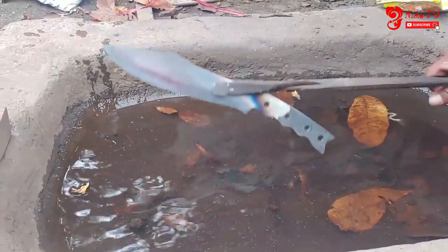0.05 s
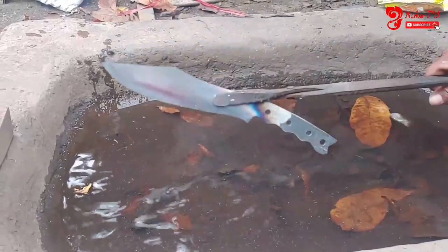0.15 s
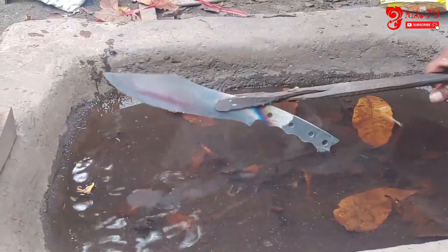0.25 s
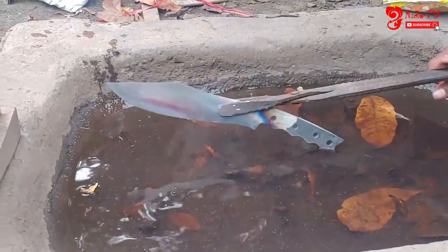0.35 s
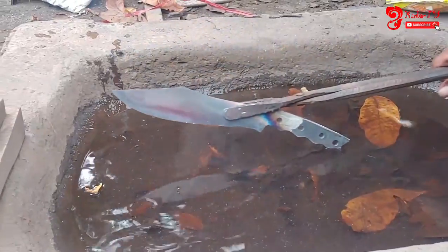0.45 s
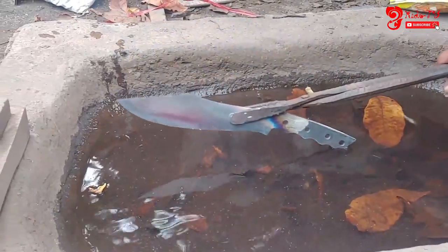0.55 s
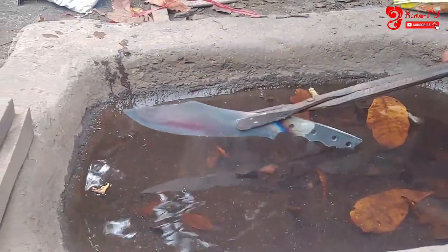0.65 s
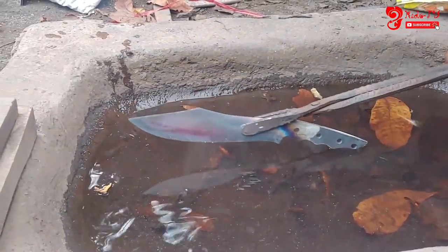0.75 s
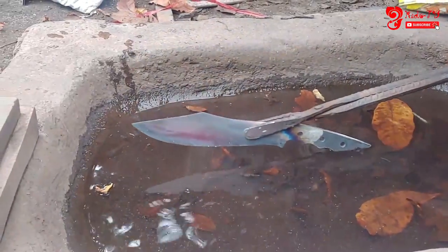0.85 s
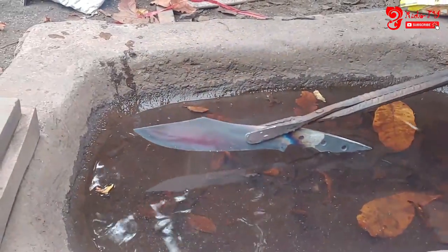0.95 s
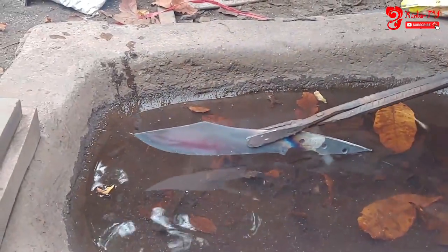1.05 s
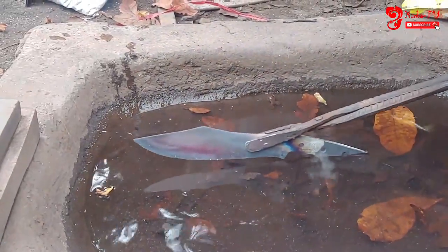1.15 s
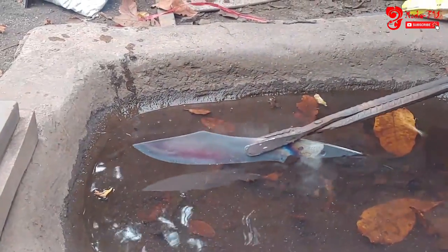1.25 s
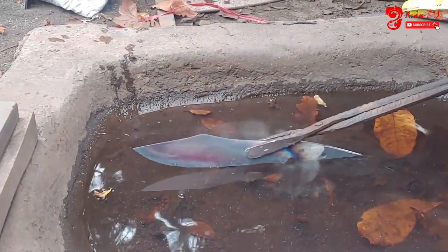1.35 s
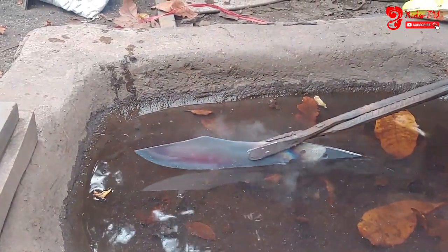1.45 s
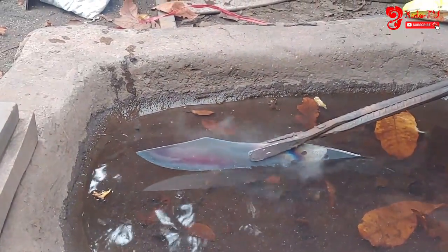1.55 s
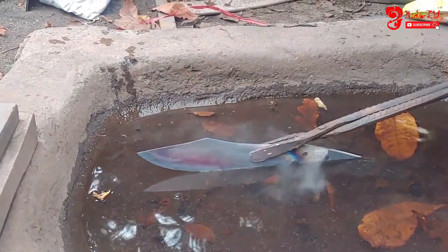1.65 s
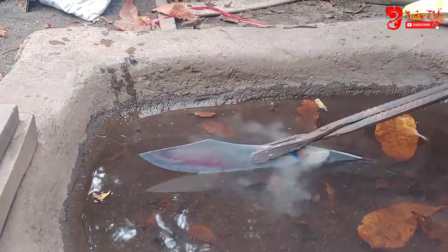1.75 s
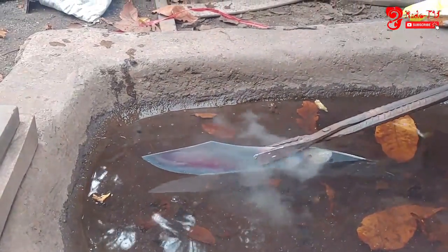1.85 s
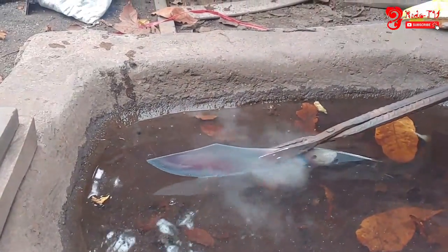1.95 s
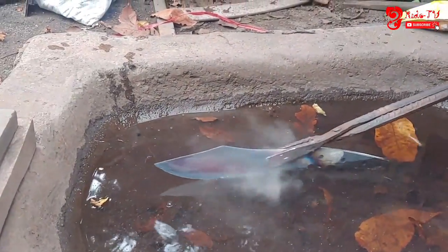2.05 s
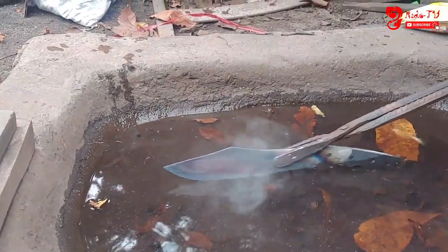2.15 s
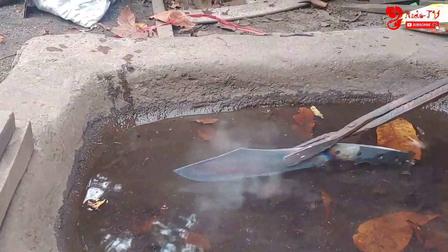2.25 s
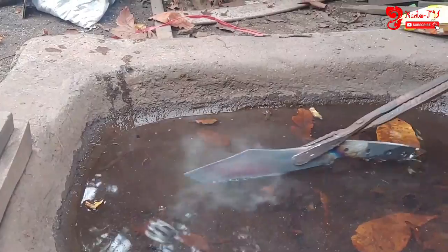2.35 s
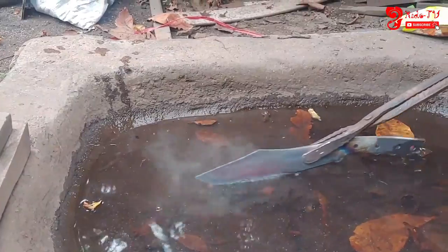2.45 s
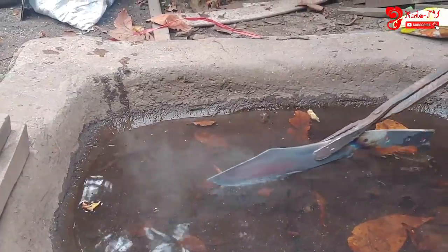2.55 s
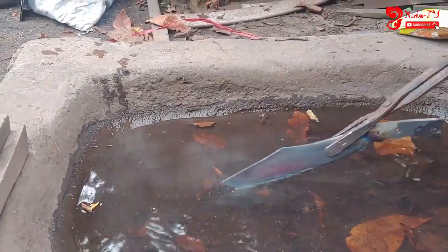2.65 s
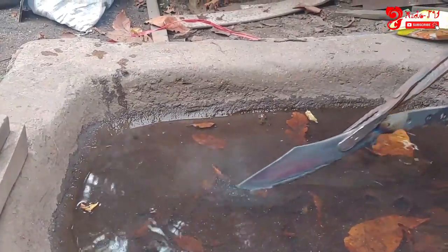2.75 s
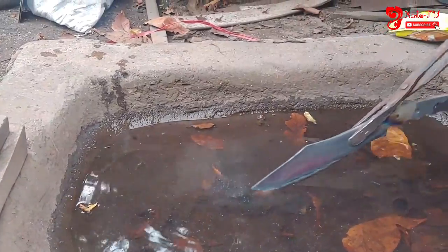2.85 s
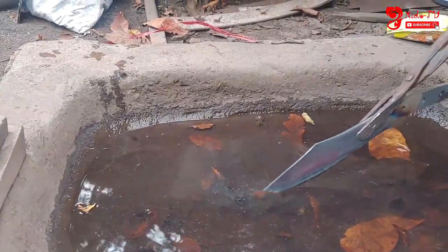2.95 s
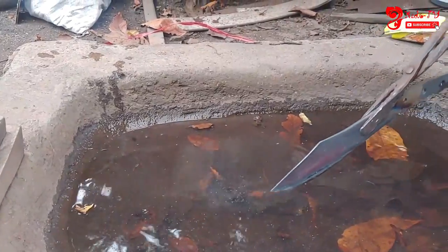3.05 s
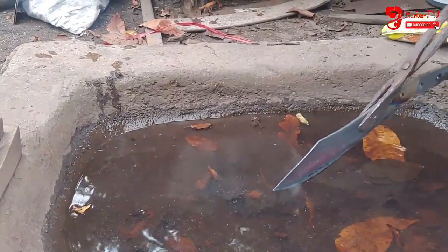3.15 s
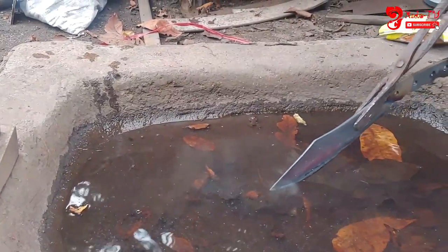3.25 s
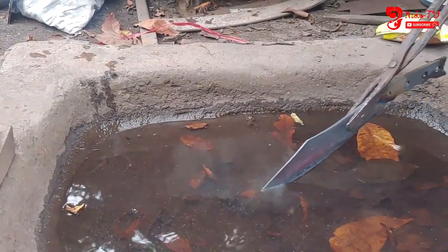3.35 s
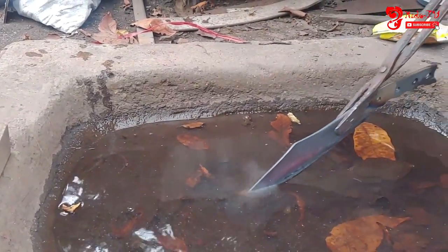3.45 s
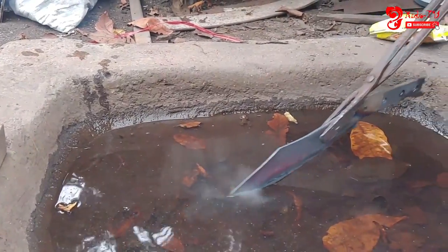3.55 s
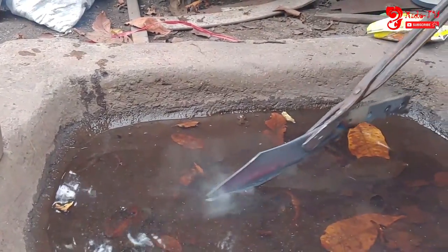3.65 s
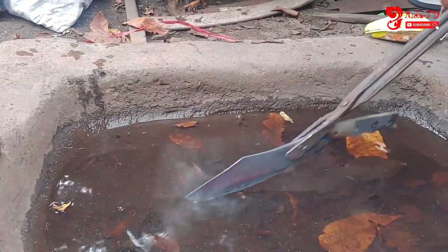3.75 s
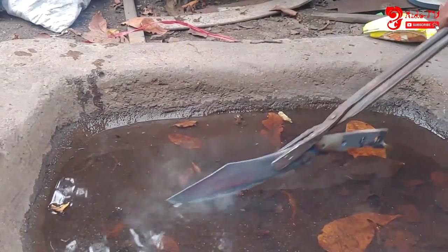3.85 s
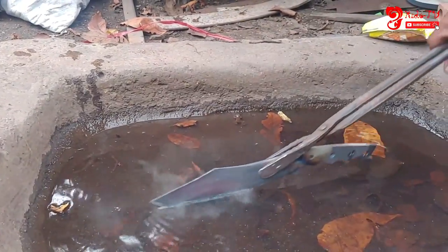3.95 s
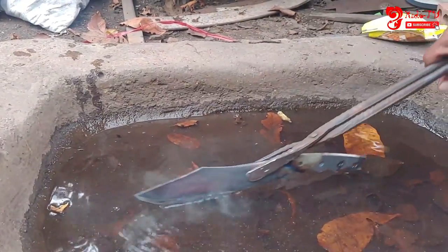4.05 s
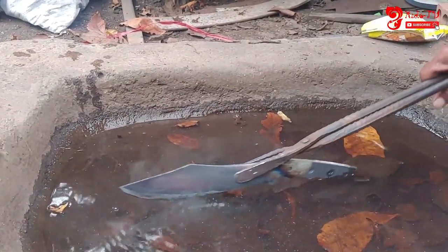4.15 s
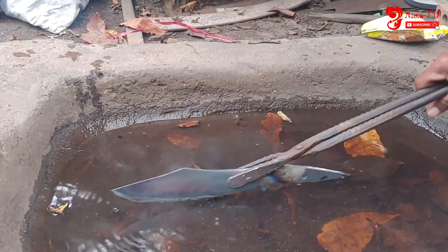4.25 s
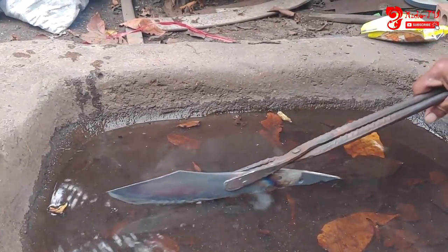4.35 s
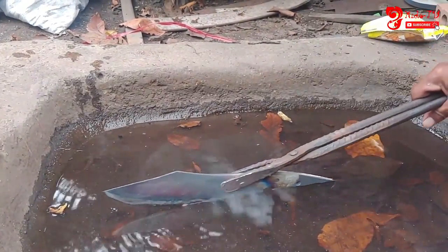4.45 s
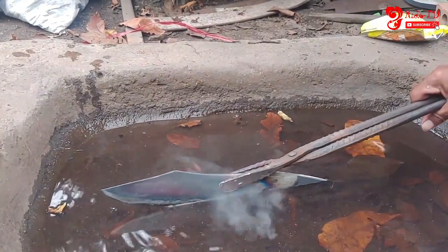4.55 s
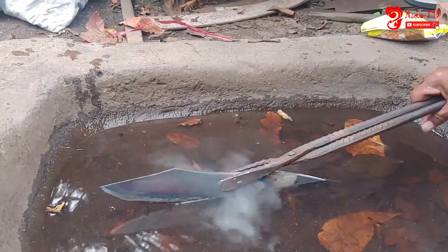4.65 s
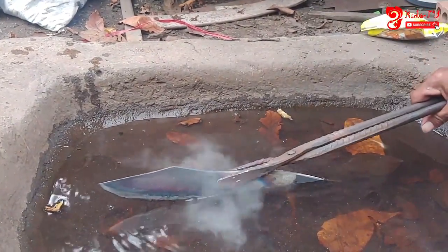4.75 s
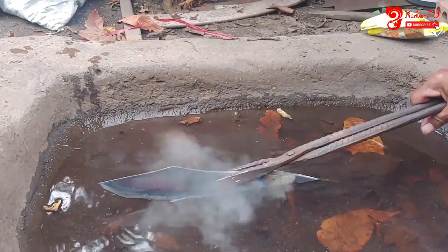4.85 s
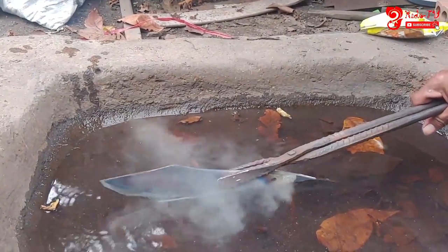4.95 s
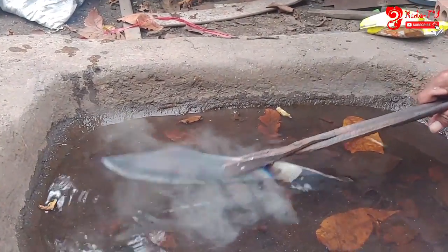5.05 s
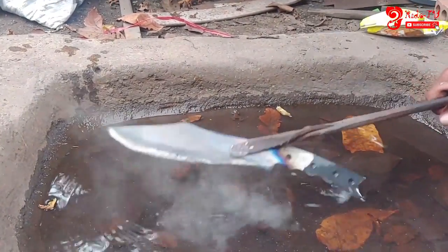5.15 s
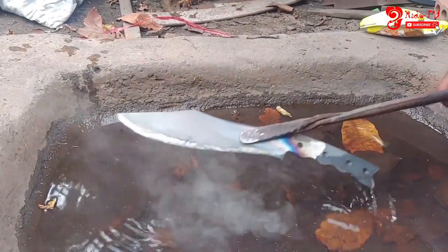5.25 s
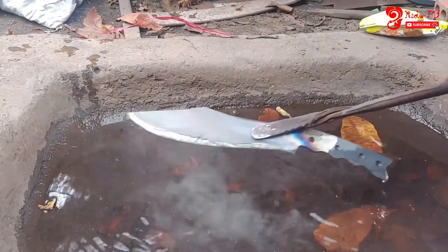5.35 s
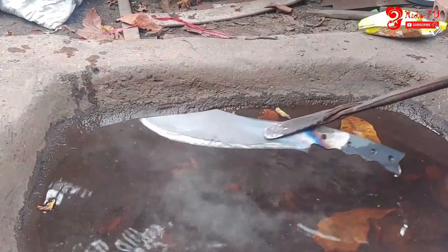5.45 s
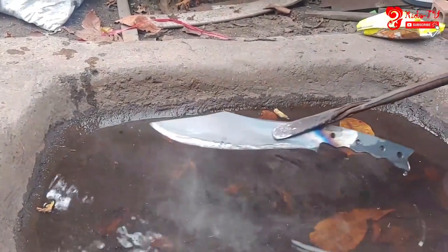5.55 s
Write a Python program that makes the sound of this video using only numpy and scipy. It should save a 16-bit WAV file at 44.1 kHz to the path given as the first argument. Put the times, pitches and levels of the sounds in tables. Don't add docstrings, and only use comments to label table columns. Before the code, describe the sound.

For the first 0.8 s there is only a faint outdoor wash, a distant motorbike idling in soft uneven thuds, and tiny drips. A faint rising bird whistle and thin metallic tones come just before a hot blade touches water in a trough. From about 0.8 s hiss rises fast, reaching a strong, bright, crackling sizzle by 1.5 s, with a sharp spit near 1.7 s. It stays close, wide and gusty, with spits and ticks around 2.4 s, thinner and a little softer near 3 s, then fuller again. Short dropouts come near 3.85 and 4.3 s as the blade lifts. Low thuds grow behind; from 4.2 s the motorbike pulls away, its barking exhaust rising in pitch. After a last deep gurgling burst at 5.1 s, the hiss falls away steeply, leaving the receding engine and a clearer upward bird whistle around 5.3 s until the end at 5.6 s.

```python
import sys
import numpy as np
from scipy import signal
from scipy.fft import rfft, irfft, next_fast_len
from scipy.io import wavfile
from scipy.ndimage import uniform_filter1d

SR = 44100
rng = np.random.default_rng(int(sys.argv[2]) if len(sys.argv) > 2 else 0)


def how_loud(loudness_db):
    steps = np.asarray(loudness_db, float) / 20
    return 10 ** steps


def put_to_file(sound):
    columns = np.atleast_2d(sound).T
    safe = np.clip(columns, -1, 1)
    whole_steps = np.round(safe * 32767)
    wavfile.write(sys.argv[1], SR, whole_steps.astype(np.int16))


N = 247401
T = np.arange(N) / SR
TAIL = 9000


def evened(x):
    return x / np.sqrt(np.mean(x ** 2) + 1e-20)


def read(points, hz):
    f, value = np.transpose(points)
    return np.interp(np.log(hz + 1), np.log(f + 1), value)


def columns(rows, t):
    s, *rest = np.transpose(rows)
    return [np.interp(t, s, c) for c in rest]


def bumps(modes, hz):
    return sum(db / (1 + (2 * (hz - f) / width) ** 2) for f, width, db in modes)


def resonate(x, hz, width):
    turn = np.exp(2j * np.pi * hz * T)
    r = np.exp(-np.pi * width / SR)
    return 2 * (turn * signal.lfilter([1 - r], [1, -r], x / turn)).real


def ring(modes):
    t = T[:TAIL]
    out = sum(how_loud(db - 60 * t / t60) * np.sin(2 * np.pi * hz * t) for hz, db, t60 in modes)
    return out / abs(out).max()


def drift(shape, widths):
    x = rng.standard_normal(shape)
    for axis, width in enumerate(widths):
        for _ in range(2):
            x = uniform_filter1d(x, int(width), axis)
    return evened(x)


def echoes(x, t60, gap_s, same):
    t = T[:TAIL]
    tail = same * rng.standard_normal(TAIL) + np.sqrt(1 - same ** 2) * rng.standard_normal((2, TAIL))
    tail *= how_loud(-60 * t / t60) * (t > gap_s)
    return signal.oaconvolve(x[None], tail / np.linalg.norm(tail[0]), axes=1)[:, :N]


def to_ports(left, other, hz, lead, likeness):
    same = np.clip(read(likeness, hz)[:, None] + .16 * drift(left.shape, [2, 110]), 0, .98)
    right = same * left * np.exp(-1j * lead) + np.sqrt(1 - same ** 2) * other
    return signal.istft(np.array([left, right]), nperseg=512, noverlap=384)[1][:, :N]


# [t/s, level/dB, deep gurgle/dB]
BOIL = [(0, -68.5, 17), (.3, -68, 16), (.61, -81.5, 27), (.785, -74, 23), (.815, -48, 11),
        (.96, -38.5, -10), (1.14, -26.5, -5), (1.41, -23.5, 1.5), (1.56, -16.5, -0.5), (2.01, -15.5, 0),
        (2.42, -19.5, 6.5), (2.7, -19.5, 4.5), (2.96, -23.5, -3), (3.2, -20, -4), (3.49, -20.5, -1.5),
        (3.76, -18, -4), (4.05, -17, 2.5), (5.05, -16, 0)]
# [start t/s, out/s, return/s, level change/dB, gurgle change/dB]
LIFTS = [
    (0.839, 0.0067, 0.016, -10, 0),
    (2.14, 0.0083, 0.11, -0.5, -3),
    (2.74, .01, 0.092, -2.5, -2),
    (2.989, 0.047, 0.039, -3.5, -4),
    (3.759, 0.0039, 0.037, -15.5, 5),
    (4.138, 0.13, 0.062, -14.5, 0),
    (4.23, 0.044, 0.2, -6, -9),
    (4.7, .05, 0.053, -4, 2),
    (5.07, .6, .1, -32, 8),
]
# [t/s, half length/s, level/dB, gurgle change/dB]
SPLASHES = [
    (2.393, 0.0097, 4, 3),
    (2.668, 0.026, 2, -2),
    (3.326, 0.025, 0.5, 5.5),
    (5.111, 0.036, 3.5, 8),
]


def boiling(t):
    boil_db, gurgle_db = columns(BOIL, t)
    drop_db = thin_db = 0
    lift_s = 0.099
    for s, out_s, back_s, db, change_db in LIFTS:
        back = s + lift_s + out_s
        out = np.interp(t, [s, s + lift_s, back, back + back_s], [0, 1, 1, 0])
        drop_db = drop_db + db * out
        gurgle_db = gurgle_db + change_db * out
        thin_db = thin_db - 0.4 * change_db * out
    for s, half_s, db, change_db in SPLASHES:
        burst = np.exp(-((t - s) / half_s) ** 2)
        boil_db = boil_db + db * burst
        gurgle_db = gurgle_db + change_db * burst
    top_db = 1.5 + thin_db - 0.095 * drop_db
    return boil_db + drop_db, gurgle_db, 0.38 * gurgle_db, top_db


# [f/Hz, level/dB per Hz]
STEAM = [(300, -32.5), (750, -27.5), (1050, -21.5), (1400, -18.5), (2000, -9.5), (3400, -10.5),
         (5000, -4.5), (7000, -2.5), (9000, -7.5), (12000, -9), (15500, -19)]
# [f/Hz, width/Hz, level/dB]
TROUGH = [(1056, 82, 13.5), (1240, 380, -0.5), (1866, 140, 3.5), (2140, 64, 2), (2230, 160, -0.5),
          (3070, 300, 2), (3560, 340, 3.5), (7680, 360, 2.5)]
# [f/Hz, likeness/1]
SAME = [(300, .8), (700, .3), (1050, .82), (1500, .3), (1800, .7), (2030, .85), (2180, .45), (2400, .7),
        (3000, .4), (3280, .78), (3500, .45), (3900, .72), (4400, .4), (15000, .45)]
# [f/Hz, phase/rad]
LEAD = [(1100, .2), (1450, 2.4), (1600, .5), (1850, 1.3), (2000, 3.0), (2090, 3.5), (2250, 6.2),
        (2600, 7.2), (2880, 9.2), (3350, 9.6), (3750, 12.4), (5000, 14.2), (6720, 28.6), (15700, 52.3)]


def steam():
    pockets_per_s = 1500
    sizes = how_loud(2.24 * np.minimum(rng.exponential(1, (2, N)), 5))
    crackle = sizes * rng.standard_normal((2, N)) * (rng.random((2, N)) < pockets_per_s / SR)
    fizz = rng.standard_normal((2, N)) + 0.29 * evened(crackle)
    fizz *= how_loud(0.36 * drift(N, [120]) + 0.41 * drift(N, [900]))
    hz, t, z = signal.stft(fizz, SR, nperseg=512, noverlap=384)
    boil_db, low_db, mid_db, top_db = boiling(t)
    octave = np.log2(hz + 1)[:, None]
    low = np.clip((np.log2(3000) - octave) / 0.69, 0, 1)
    mid = np.clip((np.log2(5400) - octave) / 0.24, 0, 1) - low
    top = np.clip((octave - np.log2(8800)) / 0.19, 0, 1)
    colour_db = read(STEAM, hz) + bumps(TROUGH, hz)
    field_db = colour_db[:, None] + top * top_db + boil_db + low * low_db + mid * mid_db
    field_db = field_db + 0.99 * drift(field_db.shape, [4, 12]) + 1.0 * drift(field_db.shape, [2, 90])
    sway = (hz[:, None] / 9000) ** 2 * 2.17 * drift(len(t), [150])
    z = z * how_loud(field_db + 5.5)
    return to_ports(z[0], z[1], hz, read(LEAD, hz)[:, None] + sway, SAME)


# [t/s, peak level/dB, f/Hz, t60/s, left-right/dB]
SPITS = [
    (.092, -61, 5970, 0.17, -15),
    (.188, -59, 1910, 0.097, -19),
    (.288, -58, 6400, .04, -12),
    (0.357, -53, 1270, 0.053, -11),
    (1.722, -8, 4130, 0.045, 2),
    (2.39, -15, 2550, 0.029, -6),
    (2.396, -25, 1108, 0.11, -9),
    (2.423, -22, 7350, .015, 3),
    (2.463, -12, 7260, .012, 4),
]


def spits():
    out = np.zeros((2, N + TAIL))
    for s, db, hz, t60, pan_db in SPITS:
        drop = ring([(hz, 0, t60), (hz * 2.2, -7, t60 * 0.44)])
        drop *= np.minimum(T[:TAIL] / 0.0038, 1)
        start = round(s * SR)
        out[:, start:start + TAIL] += how_loud(db + np.array([[.5], [-.5]]) * pan_db) * drop
    return out[:, :N]


# [f/Hz, level/dB, t60/s]
BARK = [(272, -6, 0.11), (311.2, 3, 0.075), (337.6, -11, 0.087), (450, -5, 0.0065)]
# [t/s, firing rate/Hz]
SPEED = [(4.22, 15.3), (4.33, 16.4), (4.45, 18.6), (4.55, 19.6), (4.7, 21.0), (4.9, 22.0), (5.15, 22.7),
         (5.35, 23.3), (5.61, 24.7)]
# [t/s, level/dB, boom share/dB]
REV = [
    (4.22, -42.5, 3),
    (4.37, -36.5, 4.5),
    (4.6, -33, -3.5),
    (4.74, -37.5, 2),
    (4.82, -33.5, -4.5),
    (5.43, -36.5, 0.5),
    (5.61, -39, -2),
]
# [multiple of firing rate/1, level/dB]
LOW_ORDERS = [(2, -34), (3, -28), (4, -5.5), (5, 0.5), (6, 0), (7, -7)]


def pulling_away():
    bark_db, share_db = columns(REV, T)
    running = np.clip((T - SPEED[0][0]) / .01, 0, 1)
    turns = np.cumsum(columns(SPEED, T)[0] * (running > 0)) / SR + .85
    fires = np.diff(np.floor(turns), prepend=0) * how_loud(1.2 * drift(N, [400]))
    orders = 0
    for k, db in LOW_ORDERS:
        orders = orders + how_loud(db + 4.8 * drift(N, [1500])) * np.cos(2 * np.pi * k * (turns - .14))
    bark = ring(BARK) * (1 - np.exp(-(T[:TAIL] / 0.003) ** 2))
    barks = signal.oaconvolve(fires * how_loud(bark_db + 14.0), bark)[:N]
    return running * how_loud(bark_db + share_db - 4.5) * orders + barks


# [t/s, thud level/dB, thud f/Hz]
IDLE = [(.06, -50, 103), (.3, -55, 101), (.55, -62, 85), (.8, -53, 86), (1.2, -47, 99), (1.6, -50.5, 74.5),
        (2.0, -48, 84), (3.0, -48.5, 81.3), (4.17, -44, 90)]
# [t/s, firings so far/1]
IDLE_TURNS = [(.059, 0), (.674, 7), (.977, 10), (1.755, 17), (1.889, 18), (2.25, 22), (2.677, 26),
              (2.929, 28), (3.09, 30), (3.508, 34), (3.971, 38), (4.168, 40)]
# [t/s, peak level/dB, f/Hz]
HEAVY = [
    (.977, -41, 65.6),
    (1.349, -45, 94),
    (1.412, -43.5, 89),
    (1.755, -47, 65),
    (2.157, -46, 81),
    (2.678, -42, 76.6),
    (3.089, -35.5, 81),
    (3.508, -35.5, 92),
    (3.548, -36, 66),
    (3.97, -38.5, 104),
]


def idle_thuds():
    uneven_db, uneven_pitch = 4, 0.1
    anchors, counts = np.transpose(IDLE_TURNS)
    s = np.interp(np.arange(counts[-1] + 1), counts, anchors)
    db, hz = columns(IDLE, s)
    chance = rng.standard_normal((len(s), 3))
    thud_db = db + uneven_db * chance[:, 0]
    thud_hz = hz * (1 + uneven_pitch * chance[:, 1])
    knock_db = -25 + .3 * columns(DRONE, s)[0] + uneven_db * chance[:, 2]
    return list(np.c_[s, thud_db, thud_hz, knock_db]) + [(s, db, hz, -30) for s, db, hz in HEAVY]


def idling():
    out, t = np.zeros(N + TAIL), T[:TAIL]
    for s, db, hz, sharp_db in idle_thuds():
        swell = t / 0.015 * np.exp(1 - t / 0.015)
        thud = np.sin(2 * np.pi * hz * t) + 0.39 * np.sin(2 * np.pi * 1.51 * hz * t + 1)
        knock = how_loud(sharp_db + 20) * ring(BARK) * np.minimum(t / 0.0037, 1)
        start = round(s * SR)
        out[start:start + TAIL] += how_loud(db - 1) * (swell * thud + knock)
    return out[:N]


# [t/s, nearness/dB, strain/dB]
DRONE = [(0, -1, -4), (.67, -9, -4), (.95, 4.5, 3), (1.55, 13, 9), (2.5, -1, -5), (2.72, 21, 3),
         (2.95, 12, 4), (3.06, 26.5, 2), (3.5, 21.5, 5), (3.67, 31, 7), (3.83, 19, 6), (3.95, 25.5, 10),
         (4.4, 31.5, 15), (4.8, 30.5, 19), (5.22, 32, 23), (5.61, 32.5, 23.5)]
# [f/Hz, width/Hz, far level/dB, slope/dB per dB of nearness, wander/dB]
DRONE_PARTS = [(64, 32, -65, .5, 2), (189, 9, -79, .35, 1.0), (462, 70, -74, 1.0, 1.5),
               (300, 130, -77, .55, 3)]
# [t/s, half length/s, level/dB]
HUMS = [
    (2.416, 0.18, 16.5),
    (2.703, 0.028, 10),
    (3.802, .16, 12),
    (4.096, 0.15, 16),
    (5.298, 0.45, 16.5),
]


def engine_drone():
    near_db, strain_db = columns(DRONE, T)
    buzz_db = sum(db * np.exp(-((T - s) / half_s) ** 2) for s, half_s, db in HUMS)
    drone = 0
    for (hz, width, far_db, slope, wander_db), buzz in zip(DRONE_PARTS, (0, 1, 0, 0)):
        db = far_db + slope * near_db + buzz * buzz_db + wander_db * drift(N, [3000])
        noise = rng.standard_normal(N) + 0.96 * rng.standard_normal((2, N))
        hum = evened(resonate(resonate(noise, hz, width), hz, 2 * width))
        hum = hum + buzz * 3.7 * np.sin(2 * np.pi * hz * T)
        drone = drone + how_loud(db - 1.5) * hum
    noise = rng.standard_normal(N) + 4.7 * rng.standard_normal((2, N))
    roar = evened(resonate(resonate(noise, 725, 360), 550, 460))
    roar += 0.64 * evened(resonate(resonate(noise, 1222, 51), 1350, 180))
    return drone + how_loud(-71 + strain_db) * roar


def motorbike():
    dry = pulling_away() + idling()
    wet = how_loud(-14) * echoes(dry, t60=.12, gap_s=.005, same=.85)
    return dry + wet + engine_drone()


# [start t/s, level/dB, swell/dB per s]
WHISTLES = [
    (0.763, -51, 27),
    (5.264, -42, 12),
]
# [t from start/s, f/Hz]
WHISTLE = [(0, 3000), (.02, 3400), (.036, 3600), (.048, 4050), (.085, 4350), (.125, 4480), (.16, 5150),
           (.181, 6600), (.188, 6700)]
# [t from start/s, level/dB]
WHISTLE_SHAPE = [(0, -16), (.025, 0.5), (.09, -3.5), (.12, -4), (.15, -3.5), (.175, 2.5), (.188, -6)]


def bird():
    dry = np.zeros(N)
    for s, db, swell_db in WHISTLES:
        t = T - s
        hz = columns(WHISTLE, t)[0] * (1 + .008 * drift(N, [100]))
        gate = np.clip(np.minimum(t, WHISTLE[-1][0] - t) / 0.0055, 0, 1)
        level_db = db + np.clip(swell_db * t, -20, 20) + columns(WHISTLE_SHAPE, t)[0]
        level_db = level_db + 2.5 * drift(N, [130])
        dry += gate * how_loud(level_db) * np.sin(2 * np.pi * np.cumsum(hz) / SR)
    wet = echoes(dry, t60=.17, gap_s=.003, same=.3)
    return dry * how_loud([[-9], [0]]) + how_loud([[-2], [3.5]]) * wet


# [f/Hz, level/dB per Hz]
YARD = [(15, -33), (25, 0), (98, 11.5), (231, -10), (271, 8.5), (344, -16), (1000, -40), (1280, -13),
        (2850, -18), (3350, -19), (3630, -28), (7090, -21), (15000, -75)]
YARD_DB = -58
# [f/Hz, level/dB, start t/s, end t/s]
RINGS = [(1290, -73, .5, 1.2), (2400, -76, .4, .7), (2395, -69, .69, 1.1), (3360, -73, .48, .68),
         (3380, -66, .64, .86), (5040, -69, .725, .81), (4400, -50, .87, .97), (4560, -54, .91, 1.0),
         (1760, -53.5, 1.06, 1.35), (6230, -75, .184, .34), (1360, -70, .081, .23)]


def yard():
    hz, _, z = signal.stft(rng.standard_normal((2, N)), SR, nperseg=512, noverlap=384)
    z = z * how_loud(read(YARD, hz)[:, None] + 0.99 * drift(z[0].shape, [3, 20]))
    wash = to_ports(z[0], z[1], hz, 0, [(200, 1.0), (1200, 0.17)])
    out = how_loud(YARD_DB - 3) * evened(wash)
    for hz, db, start, end in RINGS:
        gate = np.clip(np.minimum(T - start, end - T) / 0.025, 0, 1)
        tone = evened(resonate(rng.standard_normal(N), hz, 40))
        out += how_loud(db) * how_loud([[-4], [3]]) * gate * tone
    return out


def scene():
    return steam() + spits() + motorbike() + bird() + yard()


# [f/Hz, width/Hz, level/dB]
PORTS = [
    [(7263, 2080, 12), (1030, 650, 0), (8500, 1540, 3.5)],
    [(6570, 1150, 10), (3140, 780, 6), (1640, 67, -5)],
]


def band_limit(x):
    return signal.sosfilt(signal.butter(12, 16130, fs=SR, output="sos"), x)


def record(dry):
    size = next_fast_len(N)
    hz = np.fft.rfftfreq(size, 1 / SR)
    port_db = np.array([bumps(port, hz) for port in PORTS])
    heard = irfft(rfft(dry, size) * how_loud(port_db), size)[:, :N]
    over = np.maximum(abs(heard) - .6, 0)
    mix = np.sign(heard) * (abs(heard) - over + .4 * np.tanh(over / .4))
    return band_limit(mix)


dry = scene()
out = record(dry)
put_to_file(out)
```